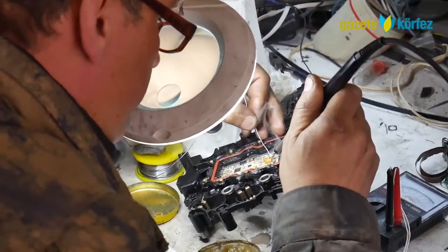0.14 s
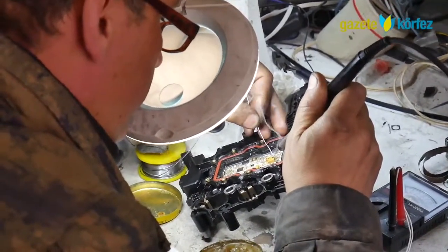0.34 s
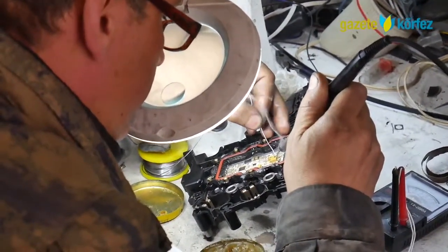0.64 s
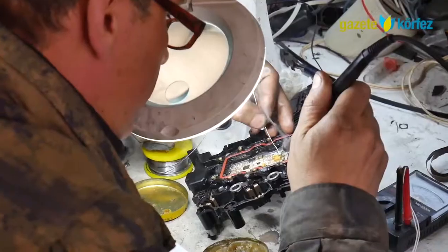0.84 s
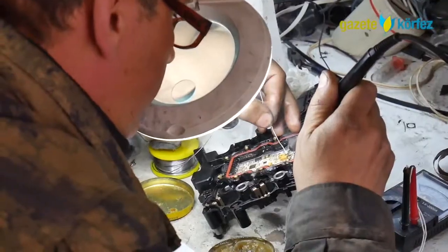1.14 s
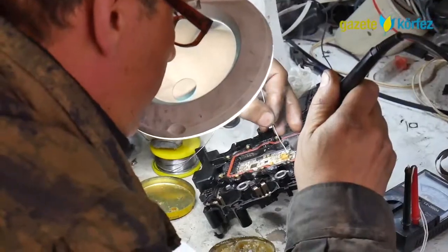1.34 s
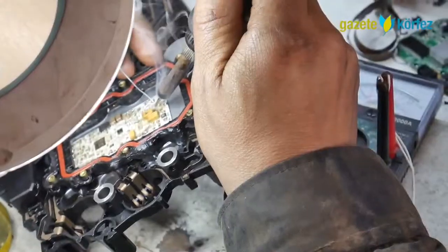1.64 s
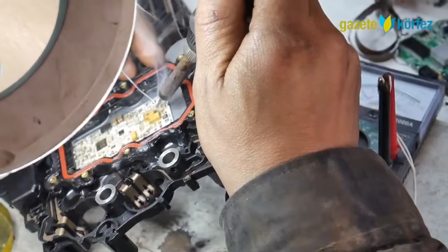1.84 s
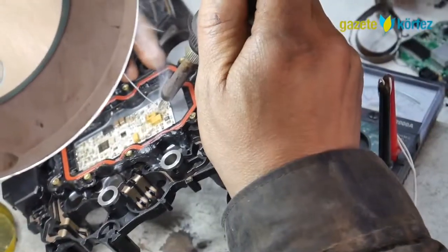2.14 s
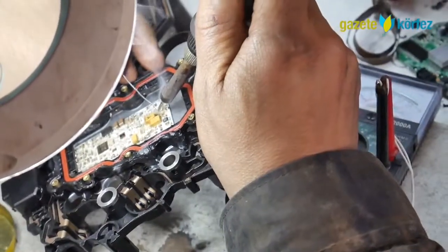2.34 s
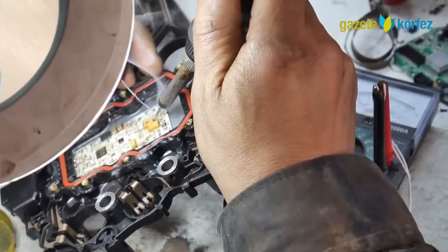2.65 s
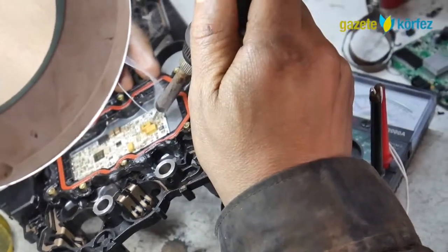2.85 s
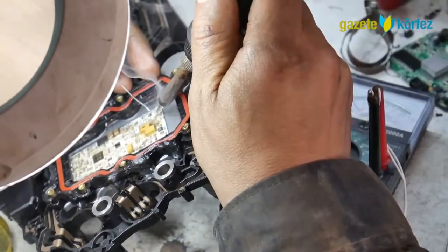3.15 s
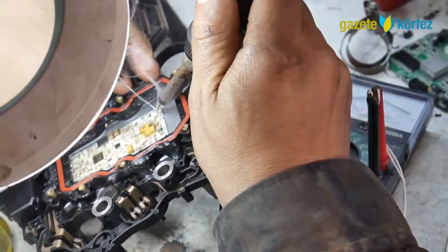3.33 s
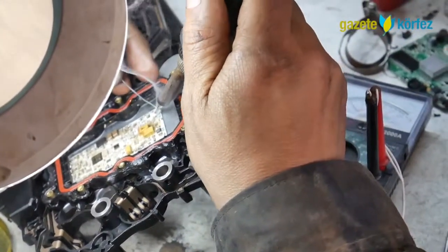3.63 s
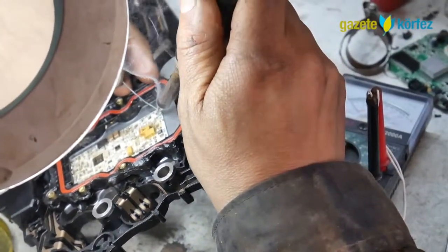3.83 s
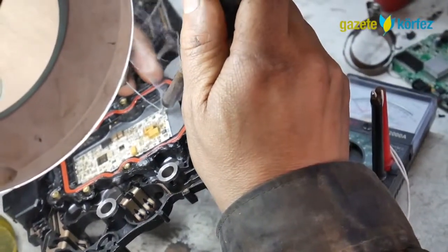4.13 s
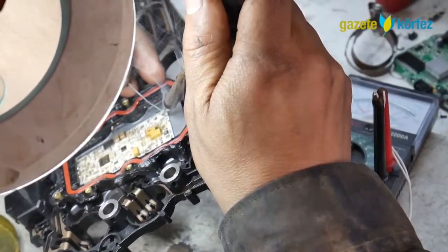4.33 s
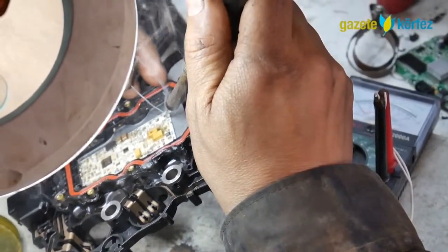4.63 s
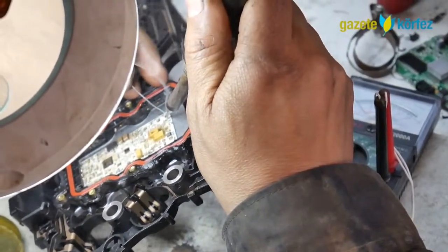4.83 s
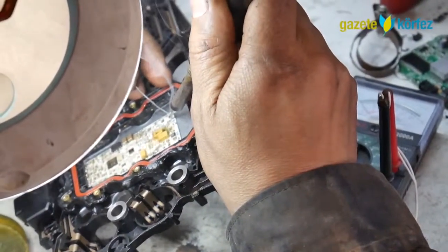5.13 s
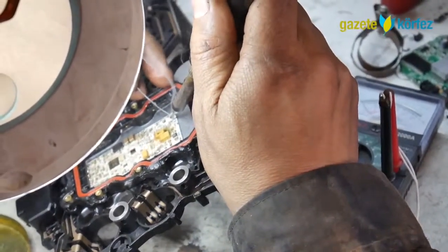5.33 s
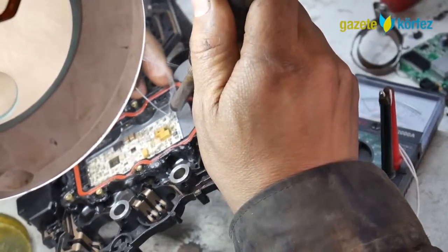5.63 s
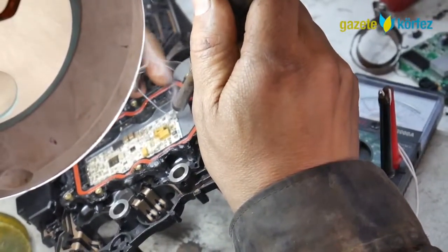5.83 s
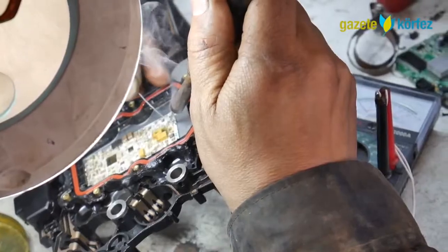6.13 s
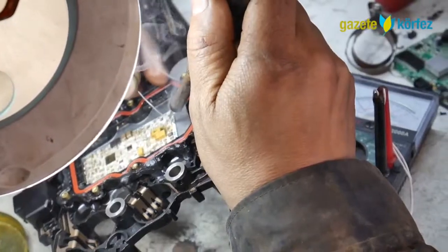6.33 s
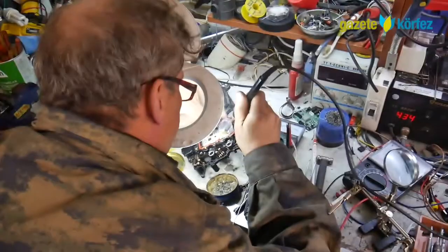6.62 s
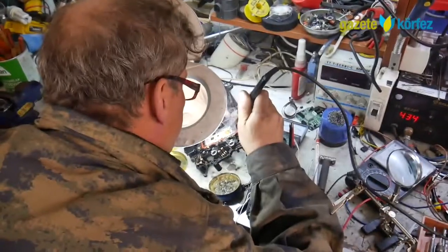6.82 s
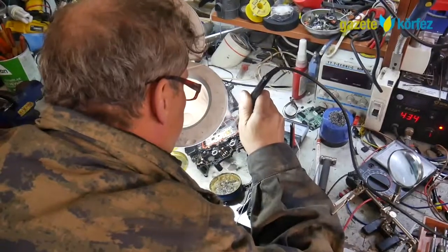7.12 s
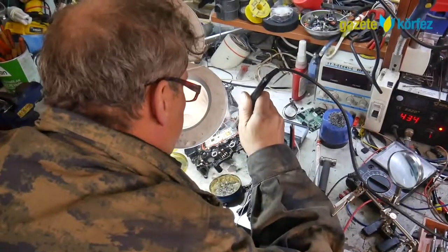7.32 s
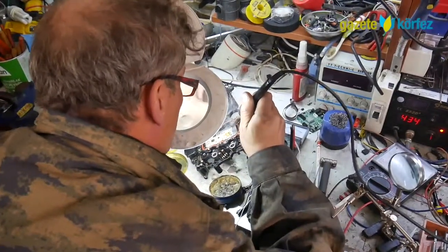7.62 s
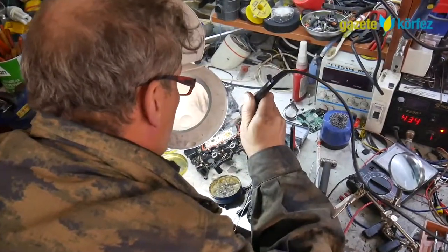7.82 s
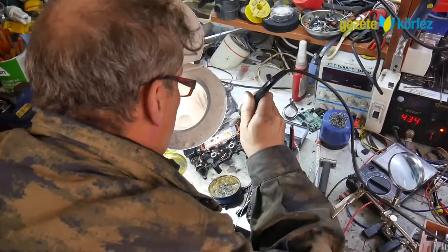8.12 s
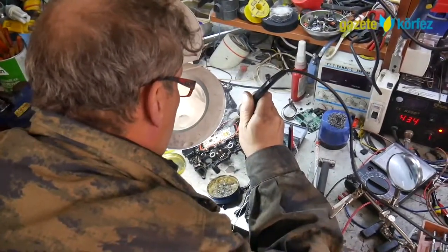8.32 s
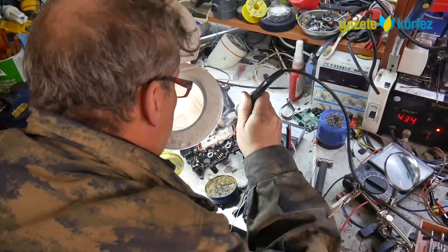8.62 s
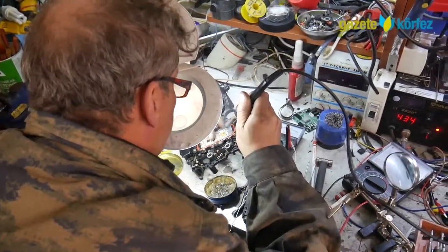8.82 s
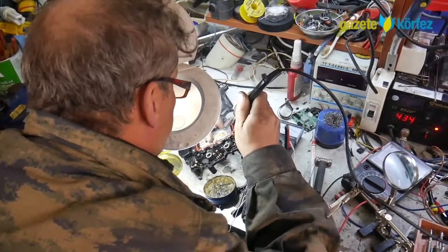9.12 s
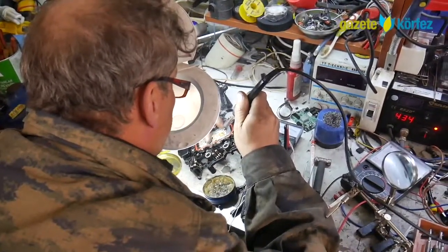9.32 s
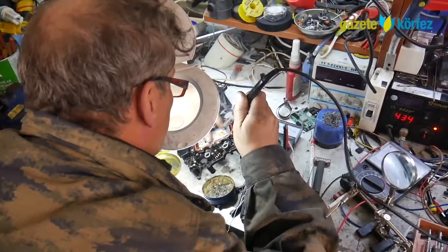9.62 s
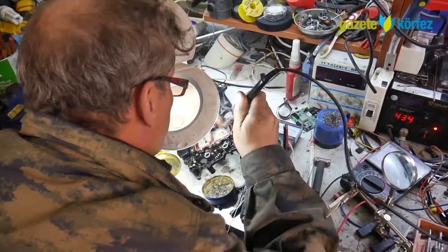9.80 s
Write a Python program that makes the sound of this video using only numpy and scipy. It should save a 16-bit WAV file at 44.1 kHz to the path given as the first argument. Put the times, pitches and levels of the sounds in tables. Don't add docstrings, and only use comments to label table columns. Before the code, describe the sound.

From 0 to 1.5 s, a small pump hums low and steadily with a buzzing edge over muffled room and street rumble. Flux fizzes softly at the start and near 1.4 s; tools scuff at 0.45 s and a hard metal tick lands at 1.25 s. Complete silence follows until 1.8 s. The hum returns with bright sizzling, spits and tiny snaps, densest from 1.8 to 2.1 and 2.4 to 3.1 s, while a muffled engine climbs in pitch behind the wall until about 3.8 s. Then mostly hum, with small ticks around 5.2 to 5.4 s and a loud tweezer clink on metal at 6.38 s. Silence from 6.55 to 6.8 s. A loud, broad compressor air rush bursts in, chokes around 7.2 s, returns by 7.4 s with a dull knock and spit at 7.63 s, and holds full from 8 s, easing slightly at the end, 9.96 s.

```python
import sys
import numpy as np
from scipy import signal
from scipy.fft import rfft, irfft
from scipy.io import wavfile

SR = 44100
rng = np.random.default_rng(int(sys.argv[2]) if len(sys.argv) > 2 else 0)


def boost_factor(decibels):
    exponent = np.asarray(decibels, float) / 20
    return 10 ** exponent


def materialize(psi):
    bounded = np.clip(np.atleast_2d(psi).T, -1, 1)
    quanta = np.round(bounded * 32767).astype(np.int16)
    wavfile.write(sys.argv[1], SR, quanta)


N = 439236
T = np.arange(N) / SR
HIT_N = 8000


def rms_one(x):
    return x / np.sqrt(np.mean(x ** 2) + 1e-20)


def in_time(rows):
    s, value = np.transpose(rows)
    return np.interp(T, s, value)


def at_hz(points, hz):
    point_hz, value = np.array(points).T
    return np.interp(np.log(hz + 1), np.log(point_hz), value)


def drift(rate_hz):
    knots = rng.standard_normal(2000)
    return np.interp(T * 2 * rate_hz, np.arange(2000), knots) * 1.3


def resonate(x, hz, width_hz):
    r = np.exp(-np.pi * max(width_hz, 2) / SR)
    zeros = [(1 - r * r) / 2, 0, (r * r - 1) / 2]
    poles = [1, -(1 + r * r) * np.cos(2 * np.pi * hz / SR), r * r]
    return signal.lfilter(zeros, poles, x + 1e-18)


def burst(rise_s, t60_s):
    t = T[:HIT_N]
    return (1 - np.exp(-t / max(rise_s, 1e-4))) * boost_factor(-60 * t / max(t60_s, .004))


def span(start_s, length=HIT_N):
    return slice(int(start_s * SR), int(start_s * SR) + length)


def pan(left_minus_right_db):
    return boost_factor([[left_minus_right_db / 2], [-left_minus_right_db / 2]])


# freq_hz, correlation
LIKENESS = [(60, .93), (130, .95), (290, .72), (640, .6), (1410, .25), (3100, .66), (6820, .86),
            (15000, .5)]
# freq_hz, left_minus_right_db
LEAN = [(60, 1.5), (180, 0.5), (550, 2), (1650, 0.5), (4970, 1), (15000, -1)]
# freq_hz, lead_rad
BASS_LAG = [(30, -.6), (90, -0.76), (150, .1), (400, 0), (15000, 0)]


def rush(spectrum, peaks, low_db, high_db, split_hz, patchy_db, ripple_db=2.0):
    hz = np.arange(N // 2 + 1) * SR / N
    db = at_hz(spectrum, hz) + sum(g / (1 + (2 * (hz - f) / w) ** 2) for f, w, g in peaks)
    db += ripple_db * np.interp(hz / 22, np.arange(1100), rng.standard_normal(1100))
    alike = np.clip(at_hz(LIKENESS, hz), 0, .98)
    mid, side = rfft(rng.standard_normal((2, N))) * np.sqrt(SR / 4) * boost_factor(db)
    both = np.sqrt(1 + alike) * mid + np.sqrt(1 - alike) * side * [[1], [-1]]
    halves = np.array([[.5], [-.5]])
    both = both * boost_factor(at_hz(LEAN, hz) * halves) * np.exp(1j * at_hz(BASS_LAG, hz) * halves)
    out, octave = 0, np.clip(np.log2(hz / 60 + 1e-9), -1, 9)
    for k in range(-1, 10):
        share = np.clip(1 - abs(octave - k), 0, 1)
        high = 1 / (1 + (split_hz / (60 * 2. ** k)) ** 3)
        level_db = high * high_db + (1 - high) * low_db + patchy_db * drift(7)
        out = out + irfft(both * share, N) * boost_factor(level_db)
    return out


# freq_hz, density_db_per_hz
ROOM = [(30, -100), (60, -82.5), (130, -78), (300, -81), (600, -84), (1000, -89.5), (1400, -94.5),
        (2000, -100), (2900, -97.5), (3900, -107), (7000, -108), (10500, -111), (13000, -113.5),
        (15500, -118)]
# time_s, level_db
ROOM_SWELL = [(0, 2), (.4, -1), (.55, 4), (1.15, -0.5), (1.4, 5.5), (1.8, 0.5), (2.4, 1), (3.8, 3),
              (4.2, -1.5), (5, 0.5), (6, 0), (7.2, 2.5), (9.96, 0.5)]
# freq_hz, width_hz, gain_db
FIRST_PEAKS = [(134, 19, -1.5), (316, 19, 8), (577, 50, 5.5), (648, 60, -10), (1200, 110, 5.5),
               (1650, 71, 6), (2610, 260, 1.5), (6560, 560, -4), (9880, 900, -4.5)]
# freq_hz, width_hz, gain_db
ROOM_PEAKS = [(301, 10, 8), (467, 15, 1), (790, 36, 12), (859, 13, 6.5), (1070, 80, 4.5), (1250, 95, 8.5),
              (1690, 32, 6.5), (2790, 330, 5), (3430, 400, 1), (6540, 830, 1), (9900, 900, 0.5)]


def room():
    swell_db = in_time(ROOM_SWELL)
    highs_db = 0.16 * swell_db - 0.46 * (T - 2.5)
    first = rush(ROOM, FIRST_PEAKS, swell_db, highs_db, split_hz=660, patchy_db=1.0)
    later = rush(ROOM, ROOM_PEAKS, swell_db, highs_db, split_hz=660, patchy_db=1.0)
    return np.where(T < 1.7, first, later)


# time_s, firing_hz
ENGINE = [
    (1.85, 54.5),
    (2.66, 64.5),
    (2.75, 66.5),
    (3.1, 71),
    (3.8, 75.5),
]
# freq_hz, level_db
WALL = [(56, -65), (63, -68), (72.5, -52.5), (76, -55), (113, -64.5), (125, -54.5), (136, -64), (147, -92)]


def engine():
    hz = in_time(ENGINE)
    turn = 2 * np.pi * np.cumsum(hz) / SR
    firing = boost_factor(at_hz(WALL, hz) + 0.97 * drift(5.4)) * np.sin(turn)
    second = boost_factor(at_hz(WALL, 2 * hz) + 1.1 * drift(6)) * np.sin(2 * turn)
    return np.sqrt(2) * (firing + second) * np.interp(T, [1.8, 1.9, 3.7, 3.85], [0, 1, 1, 0])


# start_s, end_s, stroke_hz
SHOTS = [
    (0, 1.535, 45.83),
    (1.8215, 6.537, 45.825),
    (6.8035, 9.96, 45.85),
]
# left_db, right_db
PUMP_FIRST = [(-84, -82), (-66, -61), (-75, -75), (-53, -53), (-65, -61), (-64, -66), (-63, -67),
              (-56, -55), (-70, -60), (-61, -58), (-59, -56), (-50, -55), (-64, -62), (-68, -65),
              (-67, -67), (-56, -68), (-63, -58), (-52, -69), (-58, -62), (-74, -71), (-75, -75),
              (-74, -73), (-62, -74), (-61, -71), (-60, -64), (-64, -69), (-66, -71), (-74, -65),
              (-68, -73), (-78, -84)]
PUMP_CLOSE = [(-71, -78), (-70, -64), (-68, -67), (-52, -52), (-58, -60), (-56, -57), (-60, -59),
              (-58, -59), (-59, -58), (-61, -62), (-67, -59), (-77, -58), (-55, -62), (-59, -60),
              (-70, -66), (-56, -58), (-52, -55), (-50, -53), (-80, -85), (-77, -82), (-70, -84),
              (-70, -77), (-59, -59), (-59, -73), (-63, -77), (-69, -83), (-65, -65), (-69, -65),
              (-75, -79), (-81, -84), (-80, -83), (-81, -85), (-90, -92), (-84, -86), (-82, -84)]
PUMP_WIDE = [(-74, -77), (-62, -61), (-66, -68), (-53, -54), (-66, -65), (-53, -54), (-57, -60), (-54, -57),
             (-68, -61), (-66, -60), (-78, -61), (-52, -61), (-53, -56), (-55, -53), (-57, -57), (-55, -59),
             (-56, -54), (-49, -58), (-65, -72), (-77, -67), (-80, -66), (-83, -69), (-61, -69), (-64, -82),
             (-77, -71), (-64, -80), (-62, -68), (-63, -66)]
ACROSS_NODE = [
    (14, 20, 23, 32),
    (12, 13, 22, 27),
    (17, 25),
]
STROKE_AT = [
    (.392, .682, .39),
    (.642, .92, .19),
    (.89, .6, .82),
]
TURNED = [
    (6, 7, 10, 14, 15, 22, 28),
    (3, 5, 15, 20, 27),
    (3, 5, 13, 17, 23),
]


def pump():
    knock_top_hz, ring_top_hz = 520, 890
    lead_rad_per_khz, node_lead_rad = 0.83, 2.4
    scatter_rad, turn_rad = .45, -2.2
    out = np.zeros((2, N))
    tables = PUMP_FIRST, PUMP_CLOSE, PUMP_WIDE
    for shot, table, nodes, shares, turned in zip(SHOTS, tables, ACROSS_NODE, STROKE_AT, TURNED):
        start_s, end_s, stroke_hz = shot
        on = slice(int(start_s * SR), int(end_s * SR) + 999)
        for k, (left_db, right_db) in enumerate(table, 1):
            hz = k * stroke_hz
            lead = lead_rad_per_khz * hz / 1000 * rng.choice([-1, 1])
            if k in nodes:
                lead = node_lead_rad
            at = shares[np.searchsorted([knock_top_hz, ring_top_hz], hz)]
            scatter = scatter_rad * rng.standard_normal() + turn_rad * (k in turned)
            phase = 2 * np.pi * k * (stroke_hz * T[on] - at) + .5 + scatter
            wave = np.cos([phase + lead / 2, phase - lead / 2]) * boost_factor([[left_db], [right_db]])
            out[:, on] += np.sqrt(2) * wave * boost_factor(.6 * drift(3)[on])
    return out


# time_s, peak_db, centre_hz, left_minus_right_db, contact_s
METAL_TICKS = [
    (.459, -35.5, 3000, -4, 0.0034),
    (0.465, -34.5, 2920, -2.5, 0.0011),
    (1.2522, -25.5, 3180, -5, 0.00047),
    (2.026, -32, 4230, 4, 0.0003),
    (6.3822, -23, 3340, -6.5, 0.00035),
]
# time_s, peak_db, centre_hz, left_minus_right_db, contact_s
DULL_TICKS = [(0.46, -41, 5050, -3, 0.004), (.459, -36, 2340, -2, .003), (0.42, -44, 650, 0, .003),
              (.472, -39, 1500, 5, 0.0018), (0.462, -40, 1200, 2.5, 0.0033), (.838, -52, 2660, 0, .002),
              (1.292, -39, 2600, 3.5, .004), (1.292, -38.5, 1100, 0.5, 0.0046),
              (1.524, -38, 2800, -4, 0.00087), (1.522, -39.5, 1200, -4.5, 0.0017),
              (3.664, -46, 3000, 2.5, 0.00053), (3.664, -54, 6000, 2, .0006), (3.664, -46, 1100, 2, .0008),
              (1.289, -53.5, 7700, 1, .002), (5.235, -33, 2970, -3, .0001),
              (5.2647, -32.5, 2950, -3, .0001), (5.4052, -44.5, 2900, -9, 0.00022),
              (7.634, -32.5, 1500, -1, 0.0022)]


def ticks():
    out, noise = np.zeros((2, N)), rng.standard_normal(N)
    for table, crack_db in ((METAL_TICKS, -20.5), (DULL_TICKS, -54)):
        for s, db, hz, pan_db, contact_s in table:
            t60_s = 0.041 * (1 - np.exp(-contact_s / 0.00067))
            on, envelope = span(s), burst(contact_s, t60_s)
            hit = noise[on] * envelope
            hit[3] += 12.0 * np.exp(-contact_s / 0.0005)
            band = signal.butter(4, [.66 * hz, 1.36 * hz], "band", fs=SR, output="sos")
            body = signal.sosfilt(band, hit)
            body -= 3 * boost_factor(crack_db) * resonate(hit * envelope, 6500, 5000)
            answer = resonate(noise[on] * burst(.004, 0.05), 2900, 1500)
            tail = 0.022 * resonate(answer, 3400, 1500)
            out[:, on] += boost_factor(db) * (body + tail) / abs(body).max() * pan(pan_db)
    return out


# time_s, peak_db, left_minus_right_db
CLINKS = [
    (1.2511, -28, -5),
    (6.3821, -17, -6.5),
]
# freq_hz, level_db, t60_s
TRAY = [(1500, -18, .02), (2340, -7, .011), (2620, -5, .013), (2930, -6, .011), (3250, -4, .011),
        (3580, -4, .017), (3980, -1, .01), (4250, -2, .009), (4550, -3, .009), (5300, -8, .009),
        (6325, -16, .008), (7300, -19, .007), (9000, -19, .006), (10200, -20, .005)]


def clinks():
    length = 4000
    out, t = np.zeros((2, N)), T[:length]
    for s, db, pan_db in CLINKS:
        ring = 0
        for hz, mode_db, t60_s in TRAY:
            strength, turn = rng.standard_normal(2)
            decay = boost_factor(mode_db + 1.5 * strength - 60 * t / t60_s)
            ring = ring + decay * np.sin(2 * np.pi * hz * t + .5 * turn)
        rebound = np.pad(ring, (40, 0))[:length]
        ring = ring * np.clip(t / .0003, 0, 1) - .6 * rebound
        out[:, span(s, length)] += boost_factor(db) * ring / abs(ring).max() * pan(pan_db)
    return out


# start_s, length_s, freq_hz, width_hz, level_db
WHISTLES = [(0.598, 0.069, 450, 6, -52), (1.409, 0.081, 2520, 300, -57.5), (1.43, 0.071, 3148, 1300, -68.5),
            (6.81, 0.2, 143, 41, -47.5), (8.304, 0.36, 144.5, 28, -53.5), (8.585, 0.37, 1930, 230, -48.5),
            (8.6, 0.51, 3120, 39, -56), (9.758, 0.16, 1900, 180, -52), (5.385, 0.047, 3700, 300, -66),
            (7.074, 0.17, 125, 14, -49), (0.936, 0.13, 3000, 1000, -64), (1.5, 0.037, 2820, 1100, -73)]


def whistles():
    out = 0
    for s, length_s, hz, width_hz, db in WHISTLES:
        noise = rng.standard_normal(N)
        tone = rms_one(resonate(resonate(noise, hz, width_hz), hz, width_hz))
        fade = np.clip(2.1 * np.sin(np.pi * np.clip((T - s) / length_s, 0, 1)), 0, 1)
        out = out + boost_factor(db + 0.63 * drift(25)) * tone * fade
    return out


def boil(start_s, hold_s):
    rise = np.clip((T - start_s) / .008 + 1, 0, 1)
    return rise * boost_factor(-150.5 * np.clip(T - start_s - hold_s, 0, 1))


# start_s, hold_s, level_db, upper_resonances_db
SIZZLE = [(0.0, .09, -62.5, -9), (0.103, 0.12, -61, -9), (1.015, .06, -71, 2.5), (1.36, .005, -59.5, -14),
          (1.412, .07, -61, -9), (1.813, 0.023, -55, 4), (1.884, .03, -69.5, -5), (1.93, .005, -54, -0.5),
          (1.99, .02, -69, 6), (2.022, .005, -50, -5), (2.443, .4, -57.5, 4), (2.547, .005, -66, -20.5),
          (2.66, .005, -61, -18), (2.849, 0.13, -53.5, 3), (3.03, 0.031, -77, -3.5), (3.104, .01, -85, 2),
          (6.147, .04, -66, -7.5)]
# time_s, peak_db, upper_resonances_db
SPITS = [(0.0857, -37, -19), (0.107, -44, -22), (0.1321, -37, -8.5), (1.0021, -47, -8), (1.0485, -44, -6),
         (1.4047, -37, -15.5), (1.9308, -31.5, -8), (1.942, -29.5, -9.5), (2.026, -24, -12),
         (2.038, -33.5, -18), (2.457, -32.5, -12), (2.4932, -37, -6), (2.5406, -38, -13),
         (2.552, -25.5, -19), (2.584, -38.5, 8), (2.596, -42, 0.5), (2.627, -28.5, -19), (2.6455, -27, -22),
         (2.652, -32, -24), (2.7418, -33, -4), (2.756, -37, -5.5), (2.8355, -31.5, -6),
         (2.8744, -27.5, -13), (2.8853, -38, -6), (2.961, -38, 1), (3.119, -37.5, -14.5),
         (3.7863, -43, -17.5), (3.9105, -43.5, -16.5), (4.3826, -41, -21.5), (5.1158, -41, -22),
         (7.635, -24.5, -19)]
# freq_hz, width_hz, level_db
FLUX = [(3000, 630, -9), (4870, 380, -6.5), (6740, 840, -2.5), (7900, 160, -8.5), (9640, 610, -3),
        (10540, 270, -2), (12140, 650, -8.5), (13100, 600, -10), (14200, 900, -26.5), (9000, 1000, -10)]


def flux():
    bursting = rng.random(N) < 900 * boost_factor(4 * drift(40)) / SR
    size = boost_factor(1.5 * np.minimum(rng.exponential(1, N), 4))
    grains = bursting * size * rng.choice([-1, 1], N)
    fizz = rms_one(rms_one(grains) + .5 * rng.standard_normal(N))
    lower, upper = np.zeros(N), np.zeros(N)
    for s, hold_s, db, bright_db in SIZZLE:
        envelope = boil(s, hold_s)
        lower += fizz * boost_factor(db) * envelope
        upper += fizz * boost_factor(db + bright_db) * envelope
    noise = rng.standard_normal(N)
    for s, db, bright_db in SPITS:
        on = span(s)
        spit = noise[on] * boost_factor(db - 12.5) * burst(0.0005, 0.042)
        spit[4] += 1.7 * boost_factor(db - 13.0)
        lower[on] += spit
        upper[on] += spit * boost_factor(bright_db + 12.0)
    out = 0
    for k, (hz, width_hz, db) in enumerate(FLUX):
        source = upper if hz > 8000 else lower
        out = out + (-1) ** k * boost_factor(db + 1.1 * drift(45)) * resonate(source, hz, width_hz)
    return 2.52 * out


# time_s, highs_peak_db, lower_ring_db
SNAPS = [(1.8277, -43, -15), (1.8396, -41, -11), (1.8646, -52.5, -9), (1.8803, -49, -6),
         (1.9001, -48.5, -9), (1.9038, -49.5, -1), (1.933, -38.5, -5), (1.9425, -32, -12),
         (1.946, -36.5, -11), (1.9837, -50, -9), (1.9943, -47, -9), (2.0153, -46, -9), (2.0245, -30, -6),
         (2.031, -40, -2), (2.039, -40, -2), (2.0708, -49, -7), (2.3112, -53.5, -1), (2.4318, -51, -13),
         (2.4362, -48, -12), (2.4558, -36, -7), (2.4942, -36, -10), (2.5126, -43.5, -13), (2.5415, -41, -6),
         (2.5552, -40, -8), (2.5638, -34, -10), (2.5842, -38, -15.5), (2.5887, -33, -17), (2.6267, -40, -1),
         (2.6454, -47.5, 0), (2.6494, -44.5, 0), (2.6532, -52, -0.5), (2.6666, -43.5, -7),
         (2.684, -49, -11), (2.7043, -46, -6), (2.7146, -42, -8), (2.7228, -41, -4), (2.7328, -43, -9),
         (2.7403, -31.5, -17), (2.7454, -35.5, -11), (2.7563, -38, -12), (2.7601, -40, -11),
         (2.7931, -40, -4.5), (2.812, -40.5, -5), (2.8367, -41.5, -8), (2.854, -39, -9), (2.8692, -35, -10),
         (2.9597, -36, -5), (2.9652, -35, -11), (2.9668, -38, -12), (2.9766, -39, -13), (3.0382, -45, -10),
         (3.0653, -54, -9), (3.1015, -54, -8), (3.1076, -53.5, -8), (3.1191, -45.5, -5), (3.1231, -51, -6)]
# freq_hz, width_hz, level_db
SNAP_HIGH = [(10100, 1800, 13), (12500, 2000, 12)]
SNAP_LOW = [(6800, 1400, 13), (4900, 900, 14)]


def snaps():
    high, low, noise = np.zeros(N), np.zeros(N), rng.standard_normal(N)
    for s, db, low_db in SNAPS:
        on = span(s)
        snap = .15 * noise[on] * burst(.0002, .007)
        snap[0] += np.sign(noise[on][0])
        high[on] += boost_factor(db) * snap
        low[on] += boost_factor(db + low_db) * snap
    rung = 0
    for source, rings in ((high, SNAP_HIGH), (low, SNAP_LOW)):
        for hz, width_hz, db in rings:
            rung = rung + boost_factor(db) * resonate(source, hz, width_hz)
    return signal.sosfilt(signal.butter(8, 13600, fs=SR, output="sos"), rung)


def soldering():
    spit = flux() + snaps()
    right = boost_factor(3.5) * spit + 0.58 * np.roll(spit, 9) + .45 * np.roll(spit, 31)
    return np.array([boost_factor(3.0) * spit, right])


# freq_hz, density_db_per_hz
AIR = [(30, -106), (120, -75), (200, -65), (400, -67), (800, -73), (1400, -75), (2000, -75.5), (2900, -74),
       (3900, -84), (5500, -80.5), (7000, -84.5), (10500, -97.5), (13000, -110.8), (15500, -120.6)]
# freq_hz, width_hz, gain_db
AIR_PEAKS = [(160, 21, 11), (199.3, 16.6, 8), (174, 8.7, -4.5), (249.6, 9, 2.5), (428, 9.4, 6.5),
             (504, 17.5, -15), (523, 24, 10), (590, 14, -3), (693, 57, 10.5), (824, 30, -1.5),
             (1170, 18, -3), (1350, 35, 4), (2270, 240, -4.5), (2830, 85, -2), (3507, 225, 9.5),
             (5620, 840, -7), (6780, 220, 4), (8700, 190, -11)]
# time_s, hiss_db
FLOW = [
    (6.81, -44.5),
    (6.942, -46),
    (7.216, -64.5),
    (7.386, -49),
    (7.6, -48),
    (8.02, -44.5),
    (9.54, -44.5),
    (9.96, -46.5),
]


def air():
    flow_db = in_time(FLOW) + 43.5
    surge_db = 3 * np.exp(-((T - 7.63) / 0.35) ** 2)
    rumble_db = -2.5 + 0.42 * flow_db + surge_db
    return rush(AIR, AIR_PEAKS, rumble_db, flow_db, split_hz=3400, patchy_db=0.63) * (T > 6.7)


def scene():
    background = room() + engine() + pump()
    return background + ticks() + clinks() + whistles() + soldering() + air()


def roll_off(x):
    return signal.sosfilt(signal.butter(12, 16410, fs=SR, output="sos"), x)


def record(dry):
    x = dry - 0.8 * resonate(dry, 7860, 330)
    x = signal.sosfilt(signal.cheby2(16, 50, 15950, fs=SR, output="sos"), x)
    gate = 0
    for start_s, end_s, _ in SHOTS:
        fade_in = np.clip((T - start_s) / .003, 0, 1)
        past_s = T - end_s
        fade_db = -2200 * np.maximum(past_s, 0) - 32 * np.clip(past_s / .011, 0, 1)
        gate = gate + fade_in * boost_factor(fade_db) * (T < end_s + .02)
    return roll_off(x * gate)


dry = scene()
out = record(dry)
materialize(out)
```